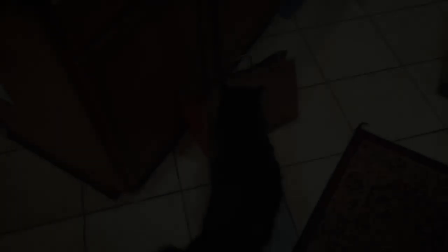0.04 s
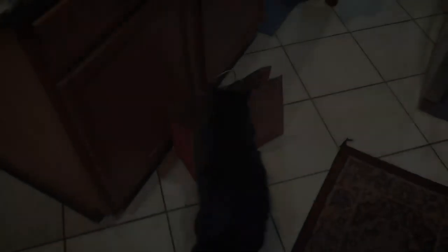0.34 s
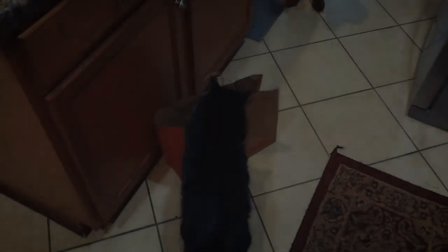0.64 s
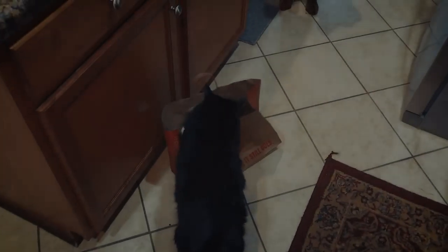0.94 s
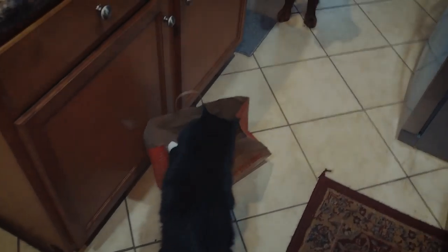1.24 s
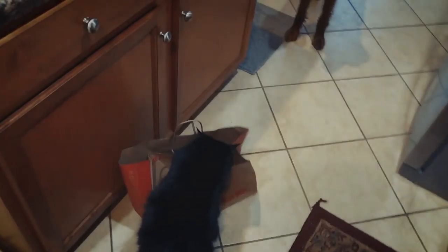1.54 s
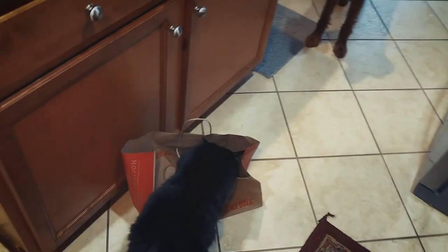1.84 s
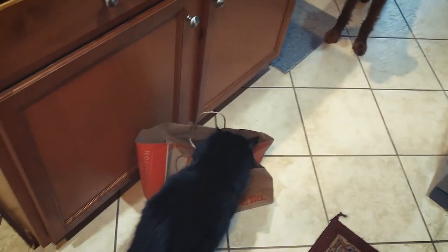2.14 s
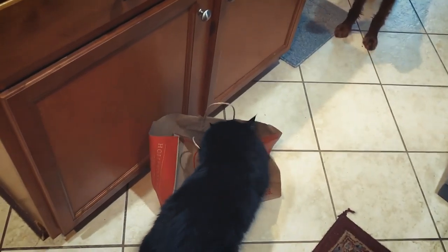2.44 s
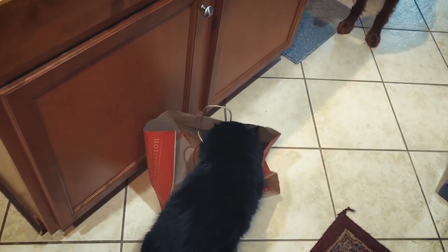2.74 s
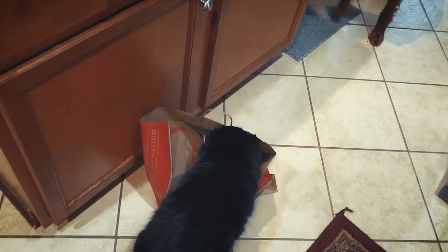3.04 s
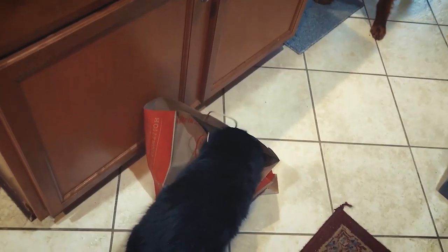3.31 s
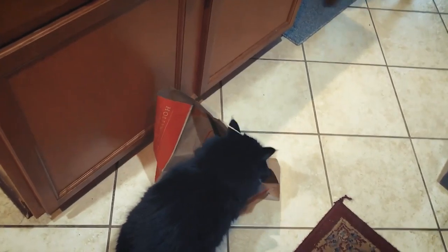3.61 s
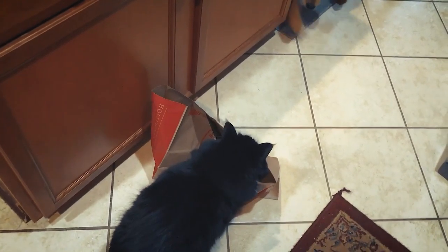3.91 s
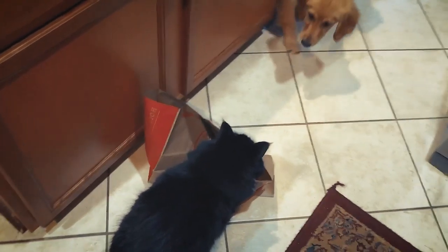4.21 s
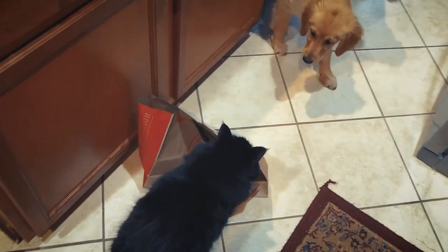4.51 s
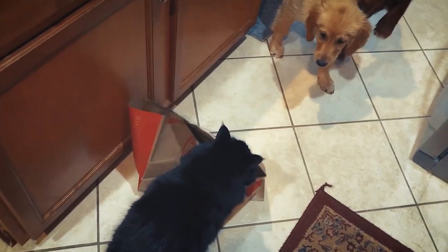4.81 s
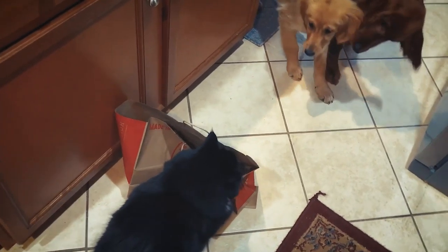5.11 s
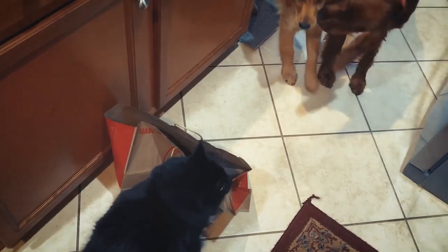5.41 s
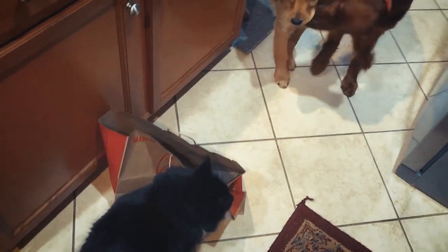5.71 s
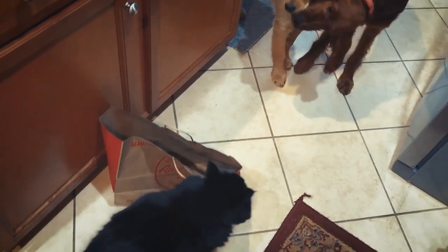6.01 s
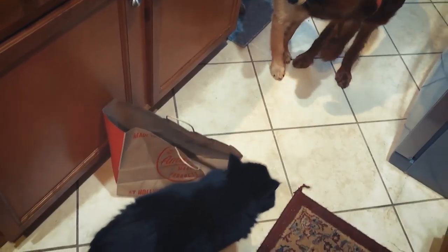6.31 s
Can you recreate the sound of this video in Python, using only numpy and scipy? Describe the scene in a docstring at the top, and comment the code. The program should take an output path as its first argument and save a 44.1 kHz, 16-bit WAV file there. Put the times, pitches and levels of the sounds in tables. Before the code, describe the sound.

Stiff paper crinkles lightly, then breaks into louder rustles, snaps and small hollow pops as a cat shoves around inside a shopping bag. The bag hisses over the tiles in short slides, and paws and bag bump softly. Toward the end the rustling dies away to single crinkles with pauses between them. It is heard from nearby in a quiet kitchen with a short echo and a barely audible fridge.

```python
"""On a tiled kitchen floor, a cat pushes its head into a paper shopping bag.
The paper rustles as it is shoved and slides along, and its stiff panels pop in and out.
Creases snap and send bending waves over the panels, so the treble arrives first and the lows after.
Paws and bag bump softly, a fridge hums, and the hard room rings briefly."""
import sys
import numpy as np
from scipy import signal
from scipy.fft import rfft, irfft, next_fast_len
from scipy.io import wavfile
from scipy.ndimage import uniform_filter1d

SR = 44100
rng = np.random.default_rng(int(sys.argv[2]) if len(sys.argv) > 2 else 0)


def unload_audio(sound):
    """Save the sound as a 16-bit wav file, at the path given as the first command line argument."""
    columns = np.transpose(np.atleast_2d(sound))
    # keep every value between -1 and 1, then stretch to whole-number steps
    steps = np.round(np.clip(columns, -1, 1) * 32767)
    wavfile.write(sys.argv[1], SR, steps.astype(np.int16))


N = 280035

BANDS = 25 * 2 ** (np.arange(20) / 2)  # band centres in Hz, half an octave apart
# Creases snapping. Each row: start in seconds, level in dB, body, crack and fizz in dB (see
# paper_colour), panel pitch in Hz, spread in ms (more spread smears the snap out longer).
SNAPS = [(0.056, -63, -27, 0, -33, 1490, 2.5), (0.133, -69.5, 2, 9, -13, 2000, 2),
         (0.69, -62, 0, 3, 1, 690, 2.1), (0.755, -52, -4, -3, -10, 890, 2.47),
         (0.777, -50.5, -13, 4, -23, 700, 4.6), (0.879, -44, -26, -18, -17, 750, 2.95),
         (0.957, -58.5, -22, 1, -15, 1750, 2.8), (1.0138, -38, -13, 0.5, -5, 5670, 4.3),
         (1.7385, -46.5, -19, -0.5, -7.5, 710, 2.94), (1.8, -49.5, -7.5, -9, -19, 900, 4.3),
         (1.8968, -43, -7.5, 4, 6, 2970, 1.6), (2.372, -53, -13, -21, -7, 556, 4.4),
         (2.388, -58, -1, 4.5, -14, 740, 2.3), (2.488, -47, -6.5, -16, -16, 530, 4.1),
         (2.533, -42.5, -7.5, -14.5, -30, 636, 2.8), (2.567, -53.5, -17, 6, -14, 1420, 4.5),
         (2.626, -41, -10, -18, -15, 990, 7), (2.659, -36.5, -5.5, -1.5, -14.5, 636, 4.9),
         (2.8188, -43.5, -10.5, -12.5, -20, 940, 3.26), (2.834, -45.5, -5.5, -9.5, -20, 930, 3.45),
         (2.9358, -50.5, 4, 7, -38, 830, 3.54), (3.0, -48.5, 5.5, -4, -28, 900, 4.3),
         (3.016, -48.5, 0, -7, -17.5, 835, 6.1), (3.064, -47, -5, 13.5, 12.5, 6000, 1.6),
         (3.068, -41.5, -4.5, -5, -20, 900, 6.9), (3.1052, -39.5, -3, 5.5, 6, 3950, 1.91),
         (3.111, -45, -7, 0, -26, 1024, 6.5), (3.661, -53.5, 7.5, 7, -10, 1010, 3),
         (3.668, -44.5, -8, 8.5, 9.5, 1740, 2.6), (4.421, -73.5, 3, 6, 4, 530, 3),
         (4.866, -42, -2, -7.5, -34, 1640, 3.4), (5.059, -58.5, -2, -22, -20, 1400, 4.4),
         (5.1041, -60.5, -14, 3.5, -29, 2070, 1.9), (5.168, -55, -3.5, -14.5, -34, 1270, 6.5),
         (5.248, -79.5, -10, 16, -8, 3930, 2.9), (5.48, -79.5, -2, 5, -8, 4330, 2),
         (5.564, -88, -2.5, 10, -4, 4500, 2), (5.928, -62.5, -24, -13, -24, 1250, 3.6),
         (5.957, -80, 4, 11, -3, 1030, 3.3), (5.9878, -43, -11.5, -5, -31, 1120, 3.93)]


def undb(db):
    """Turn decibels into a number to multiply by."""
    return 10 ** (np.asarray(db) / 20)


def unit(x):
    """Scale a signal to an average (rms) level of 1."""
    return x / np.sqrt(np.mean(x ** 2) + 1e-30)


def add(out, start, x):
    """Mix x into out, beginning at start seconds."""
    i = max(int(start * SR), 0)
    out[i:i + len(x)] += x[:len(out) - i]


def freqs(n):
    """The frequencies in the spectrum of n samples, never below 1 Hz."""
    return np.maximum(np.fft.rfftfreq(n, 1 / SR), 1)


def on_log(hz, table):
    """Read between a table's (Hz, value) rows, with octaves evenly spaced."""
    f, value = np.transpose(table)
    return np.interp(np.log(hz), np.log(f), value)


def band(x, hz):
    """Keep the half octave around hz, with soft edges, at level 1."""
    n = next_fast_len(len(x), True)
    away = np.minimum(np.abs(2 * np.log2(freqs(n) / hz)), 1)
    window = 1 - away ** 2 * (3 - 2 * away)
    return unit(irfft(rfft(x, n) * window, n)[:len(x)])


def resonance(f, hz, width):
    """How something that rings at hz answers each frequency f."""
    return 1 / (1 + 1j * (f / hz - hz / f) * hz / width)


def walk(rate):
    """A wandering line through rate random values a second."""
    position = np.arange(N) * rate / SR
    return np.interp(position, np.arange(2048), rng.standard_normal(2048))


def background(flicker_db=1, waver_db=2):
    """Faint air and a wavering fridge hum; the hum and the low air slowly grow louder."""
    # The kitchen's still air. Each row: frequency in Hz, level in dB.
    air_levels = [(25, -103), (60, -91.5), (120, -85), (200, -84), (330, -86.5), (700, -84.5), (1500, -89),
                  (4000, -88.5), (9000, -91), (15000, -92)]
    # The fridge's tones. Each row: pitch in Hz, level in dB.
    hum_tones = [(183, -80), (274.5, -85.5), (366, -83.5)]
    # The swell of the lows. Each row: time in seconds, boost in dB.
    swell = [(0, -6), (.6, 4.5), (1.5, 7.5), (4, 8), (6.35, 12)]
    t = np.arange(N) / SR
    swell_db = np.interp(t, *np.transpose(swell))
    noise = rng.standard_normal(N)
    air = sum(undb(on_log(hz, air_levels) + (hz < 500) * swell_db + flicker_db * walk(6))
              * band(noise, hz) for hz in BANDS)
    hum = sum(undb(db + swell_db + waver_db * walk(18)) * np.sin(2 * np.pi * hz * t)
              for hz, db in hum_tones)
    return (air + hum) / np.sqrt(2)


def kitchen(x, tail_db=-8.5, bass_boost_db=3, build_s=0.0031):
    """Hard surfaces add a few echoes and a fading tail; hollow spaces colour the sound."""
    # The room's ring. Each row: frequency in Hz, seconds to fade by 60 dB.
    ring_times = [(150, 0.35), (400, 0.19), (1040, 0.32), (2760, 0.39), (7280, 0.39), (15000, 0.17)]
    # Echoes off ceiling and cabinets. Each row: delay in seconds, level in dB.
    echoes = [(.0035, -30.5), (0.0151, -22.5), (0.0248, -30)]
    # The hollow of the bag and the cabinet corner. Each row: pitch in Hz, width in Hz, strength in dB.
    hollow_tones = [(152.7, 3.8, 1.5), (195, 12, -11), (283, 10.4, -0.5), (343, 28, -5), (687, 53, -3),
                    (1620, 50, -6.5), (3320, 580, -13.5)]
    t = np.arange(2 ** 15) / SR
    noise = rng.standard_normal(len(t))
    tail = sum(np.sqrt(hz) * band(noise, hz) * undb(bass_boost_db / (1 + (hz / 450) ** 2))
               * undb(-60 * t / on_log(hz, ring_times)) for hz in BANDS)
    tail *= 1 - np.exp(-(t / build_s) ** 2)
    response = undb(tail_db) * tail / np.linalg.norm(tail)
    response[0] += 1  # the direct sound
    for delay, db in echoes:
        response[int(delay * SR)] += undb(db)
    n = next_fast_len(N + len(t), True)
    hollow = 1 + sum(undb(db) * resonance(freqs(n), hz, width) for hz, width, db in hollow_tones)
    return irfft(rfft(x, n) * rfft(response, n) * hollow, n)[:N]


def bumps(rise_s=0.0055, width=1.03):
    """Soft weight lands on paper and tile with a short, dull rumble."""
    # Each row: start in seconds, level in dB, pitch in Hz, seconds to fade by 60 dB.
    landings = [(1.385, -63, 38, 0.71), (3.114, -65, 68.7, 0.66), (3.242, -48.5, 124, 0.21),
                (4.41, -51.5, 166, 0.26), (4.451, -57, 107, 0.25), (4.486, -57, 55, .45),
                (4.952, -49, 173, 0.13), (5.359, -52.5, 120, 0.23), (6.176, -56, 202, 0.48)]
    out, t = np.zeros(N), np.arange(SR // 2) / SR
    for start, db, hz, fade_s in landings:
        envelope = undb(-60 * t / fade_s) * (1 - np.exp(-t / rise_s))
        spectrum = rfft(rng.standard_normal(len(t)))
        rumble = envelope * irfft(spectrum * resonance(freqs(len(t)), hz, width * hz) ** 4)
        add(out, start, undb(db) * rumble * np.linalg.norm(envelope) / np.linalg.norm(rumble))
    return out


def paper_colour(hz, body_db, crack_db, fizz_db):
    """Level at hz in dB against the middle, set by body (lows), crack (treble) and fizz (very top)."""
    # Where body, middle, crack and fizz sit, in Hz.
    colour_hz = [310, 1200, 4500, 11000]
    body, _, crack, fizz = (np.interp(np.log(hz), np.log(colour_hz), row) for row in np.eye(4))
    low_db = np.clip(20 * np.log2(hz / 205), -22, 0)  # small panels give off little bass
    top_db = -7 * max(np.log2(hz / colour_hz[-1]), 0)  # fibres damp the very top
    return body * body_db + crack * crack_db + fizz * fizz_db + low_db + top_db


def stroke(t, start, rise, hold, release):
    """The speed of one movement: it picks up, holds and dies away."""
    return np.clip((t - start) / rise, 0, 1) * np.exp(-np.maximum(t - start - rise - hold, 0) / release)


def movements(t, settle_db=-13.5):
    """Everything that rubs the paper, each as (strength over time, (body, crack, fizz) in dB)."""
    # The cat leans on the bag. Each row: time in seconds, level in dB, fizz in dB.
    lean_rows = [(0, -68, -13), (.25, -81, -29), (.4, -101, -6), (.67, -90, -5), (.8, -62, -15),
                 (1.22, -68.5, -12), (1.6, -65.5, -4), (2.15, -69.5, -11.5), (2.7, -61.5, -5),
                 (3.3, -63, -17), (3.8, -69, -13), (4.1, -75, -8), (4.75, -79, -3.5), (5.1, -70, -3.5),
                 (5.55, -82.5, -1), (6.35, -79, -3)]
    # Shoves crumple the panels dully. Each row: start, rise and hold in seconds, level and body in dB.
    shove_rows = [(0, 0.0026, .15, -65, -15.5), (0.253, .015, 0.018, -75.5, 2.5),
                  (0.681, 0.049, 0.14, -54, -2.5), (0.91, 0.049, 0.15, -57.5, -9),
                  (1.364, 0.046, 0.047, -53, -1.5), (1.506, 0.021, 0.049, -65.5, 9.5),
                  (1.78, 0.032, .09, -61.5, 5), (2.367, .025, 0.031, -61, 6), (2.504, 0.13, 0.055, -48, 0),
                  (2.861, 0.034, .06, -68, -12), (3.104, 0.021, 0.078, -52, -10),
                  (3.658, .02, 0.1, -73.5, 10), (4.822, 0.015, 0.11, -59, 0), (4.97, 0.018, 0.12, -70, 6),
                  (5.378, 0.03, 0.049, -73.5, 7), (6.137, 0.047, .04, -71.5, 2)]
    # Paper hisses over tile and fur. Each row: start, rise and hold in seconds, level and fizz in dB.
    slide_rows = [(0.556, 0.14, 0.075, -84, 9), (0.678, 0.05, 0.1, -63, 4.5), (0.807, 0.034, 0.017, -60, 8),
                  (0.916, .035, 0.06, -63.5, 0.5), (1.233, 0.04, 0.16, -58.5, 3),
                  (1.483, 0.022, 0.056, -60.5, 0.5), (1.61, 0.022, 0.027, -70.5, 3),
                  (1.736, 0.027, 0.12, -66.5, 1), (2.21, 0.19, 0.032, -68, 0.5),
                  (2.437, 0.035, 0.24, -64, -1.5), (2.794, 0.015, 0.023, -68.5, 3),
                  (2.892, .015, 0.026, -60, 5.5), (2.942, 0.022, 0.33, -65, 0),
                  (3.275, 0.038, 0.23, -66.5, 1.5), (3.528, 0.016, 0.12, -60, 1),
                  (3.604, 0.038, 0.1, -59.5, 2.5), (3.877, 0.045, 0.05, -71.5, 1.5),
                  (4.015, 0.025, .02, -87, 12), (4.502, 0.077, 0.056, -76, 2),
                  (4.803, 0.027, 0.077, -64.5, 0), (4.969, 0.013, 0.0063, -66.5, 6),
                  (5.04, 0.045, .1, -79, -4), (5.31, 0.048, 0.011, -66, -3.5),
                  (5.539, 0.055, .05, -83.5, 7), (5.78, 0.085, 0.034, -80.5, 2.5),
                  (6.072, 0.13, .015, -73, 0.5)]
    when, *columns = np.transpose(lean_rows)
    lean_db, lean_fizz_db = (np.interp(t, when, column) for column in columns)
    leaning = [(undb(lean_db), (-0.5, -3, lean_fizz_db))]
    shoves = [(undb(db) * stroke(t, start, rise, hold, release=0.048), (body_db, -11.5, -26))
              for start, rise, hold, db, body_db in shove_rows]
    slides = [(undb(db) * stroke(t, start, rise, hold, release=0.032), (-9.5, 3, fizz_db))
              for start, rise, hold, db, fizz_db in slide_rows]
    # after each snap the paper settles, with a duller share of that snap's treble
    settling = [(undb(db + settle_db) * stroke(t, start, rise=0.014, hold=0.031, release=0.058),
                 (-4.5, crack_db - 6.5, fizz_db - 15.5))
                for start, db, _, crack_db, fizz_db, *_ in SNAPS]
    return leaning + shoves + slides + settling


def rustle(gain_db=-5, grain_db=4, crinkle_db=0.56, flicker_db=2,
           ticks_per_s=55, tick_size=0.3, tick_s=0.0015):
    """Paper fibres catch and slip in dense, uneven grains, bunched into tiny crinkles."""
    t = np.arange(N) / SR
    coarse_t = t[::64]
    moves = movements(coarse_t)
    grains = rng.standard_normal(N)
    grains *= undb(grain_db * rng.standard_normal(N) + crinkle_db * walk(rate=260))
    # now and then a small wrinkle lets go all at once
    ticks = (rng.random(N) < ticks_per_s / SR) * tick_size * (1 + rng.exponential(size=N))
    grains *= 1 + signal.lfilter([1], [1, -np.exp(-1 / (tick_s * SR))], ticks)
    out = np.zeros(N)
    for hz in BANDS[BANDS > 60]:
        power = sum((strength * undb(paper_colour(hz, *colour))) ** 2 for strength, colour in moves)
        envelope = np.interp(t, coarse_t, np.sqrt(power))
        out += envelope * undb(gain_db + flicker_db * walk(rate=110)) * band(grains, hz)
    return out


def panel_pops(glide=0.285, rise_s=0.00042, flutter_depth=0.3, overtone_db=-12, overtone_ratio=1.7):
    """A panel flips its bulge: a hollow 'plok' whose pitch drops as the tension lets go."""
    # Each row: start in seconds, level in dB, first and last pitch in Hz, length in seconds.
    pops = [(0.879, -40, 1420, 700, 0.0052), (1.7418, -30.5, 1700, 715, 0.0041),
            (1.747, -38, 710, 653, 0.011), (1.798, -39, 1050, 596, 0.0105), (1.83, -41, 790, 660, 0.0081),
            (2.374, -48, 1010, 480, 0.0076), (2.8205, -47, 1430, 720, 0.0019), (5.06, -51, 1770, 469, .014),
            (5.168, -45.5, 1652, 606, 0.016), (5.929, -54.5, 1340, 1070, 0.0056)]
    out, t = np.zeros(N), np.arange(SR // 10) / SR
    for start, db, first_hz, last_hz, length in pops:
        pitch_hz = last_hz + (first_hz - last_hz) * np.exp(-t / (glide * length))
        phase = 2 * np.pi * np.cumsum(pitch_hz) / SR
        envelope = (1 - np.exp(-t / rise_s)) * np.exp(-(t / length) ** 4)
        flutter = 1 + flutter_depth * unit(uniform_filter1d(rng.standard_normal(len(t)), size=40))
        overtone = undb(overtone_db) * np.exp(-t / length) * np.sin(overtone_ratio * phase)
        add(out, start, undb(db) * envelope * flutter * (np.sin(phase) + overtone))
    return out


def snap(body_db, crack_db, fizz_db, panel_hz, spread_ms,
         run=1.8, lag=1.2, ragged_db=4, evenness=0.42, fastest_hz=7000):
    """A fold gives way in a run of tiny slips; bending waves carry the treble faster than the lows."""
    t = np.arange(4096) / SR
    f, spread_s = freqs(len(t)), spread_ms / 1000
    slips = rng.standard_normal(len(t)) * undb(ragged_db * rng.standard_normal(len(t)))
    spectrum = rfft(slips * np.exp(-t / (run * spread_s)))
    # flatten the burst's peaks and dips so the snap sounds dry, not pitched
    spectrum /= np.abs(spectrum) ** evenness
    delay_s = lag * spread_s * np.sqrt(1000) * np.maximum(f ** -.5 - fastest_hz ** -.5, 0)
    wave = irfft(spectrum * np.exp(-2j * np.pi * np.cumsum(delay_s) * SR / len(t)))
    wave = sum(undb(paper_colour(hz, body_db, crack_db, fizz_db)) * band(wave, hz)
               for hz in BANDS[BANDS > 60])
    # the panel next to the fold rings for a few cycles
    wave = irfft(rfft(wave) * (1 + resonance(f, panel_hz, width=0.25 * panel_hz)))
    return wave * np.interp(t, [0, .0003, .05, .07], [0, 1, 1, 0])


def creases(rows, gain_db=-14):
    """Each crease snaps at its own moment."""
    out = np.zeros(N)
    for start, db, *shape in rows:
        add(out, start, undb(db + gain_db) * snap(*shape))
    return out


def scene(fold_places=4):
    """Paper sounds come from several places on the bag, each with its own room tail; left equals right."""
    paper = [creases(SNAPS[k::fold_places]) for k in range(fold_places)] + [panel_pops(), rustle()]
    mono = sum(kitchen(sound) for sound in paper) + bumps() + background()
    return np.array([mono, mono])


def record(dry, top_hz=15900):
    """Cut away the highest treble."""
    return signal.sosfilt(signal.ellip(10, .1, 80, top_hz, fs=SR, output="sos"), dry)


dry = scene()
out = record(dry)
unload_audio(out)
```